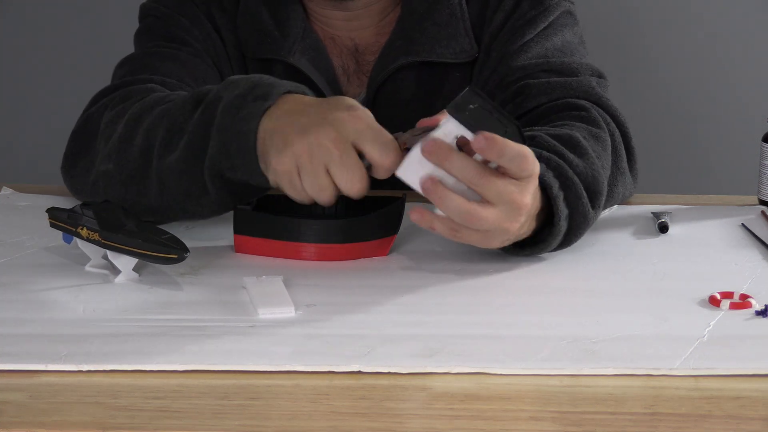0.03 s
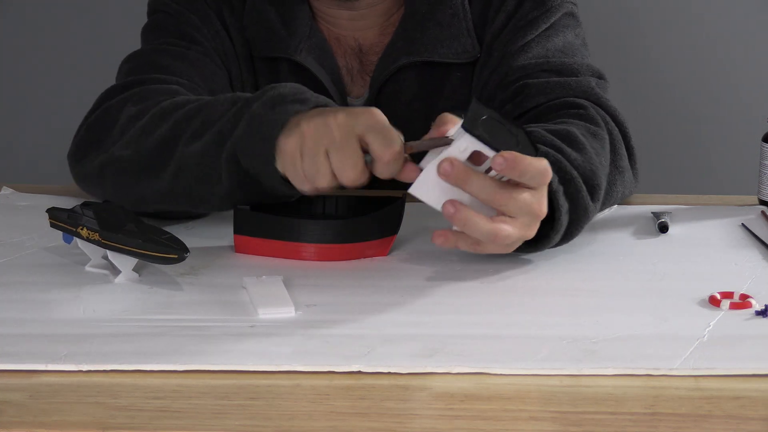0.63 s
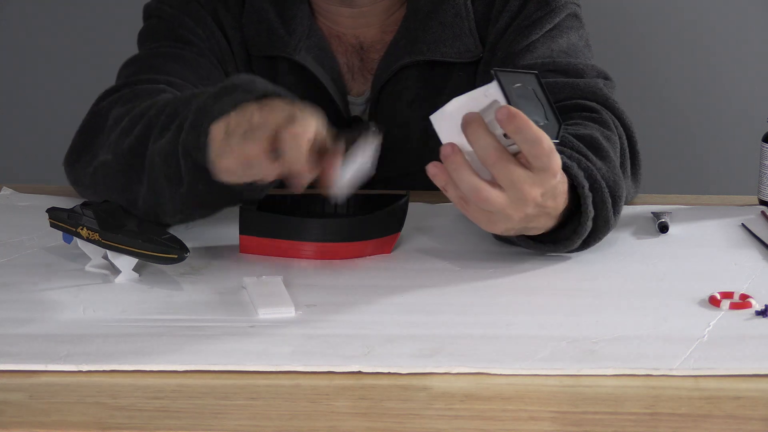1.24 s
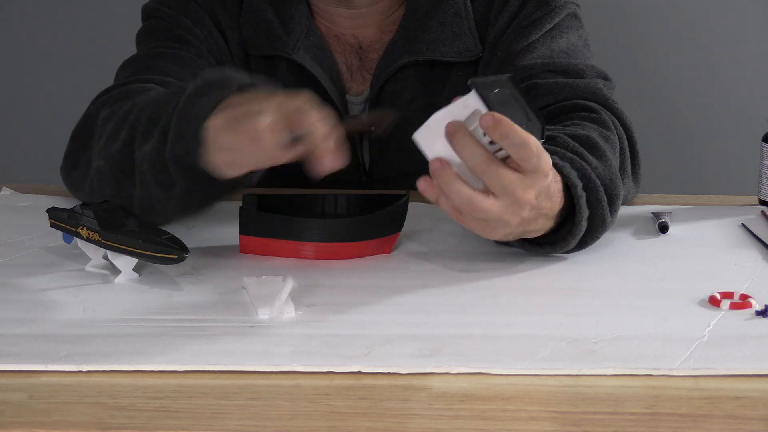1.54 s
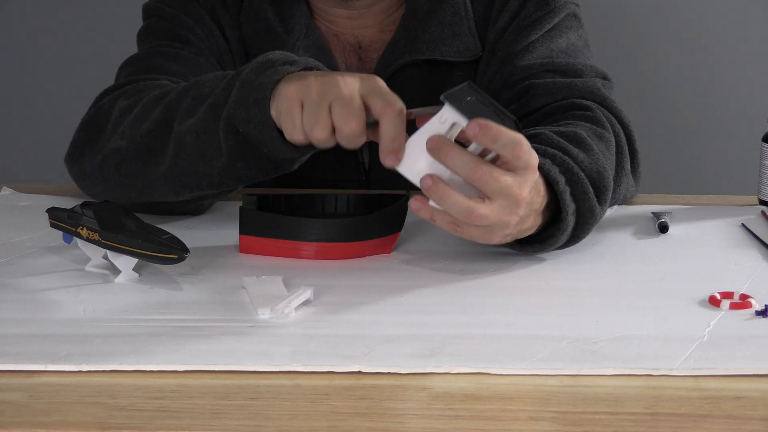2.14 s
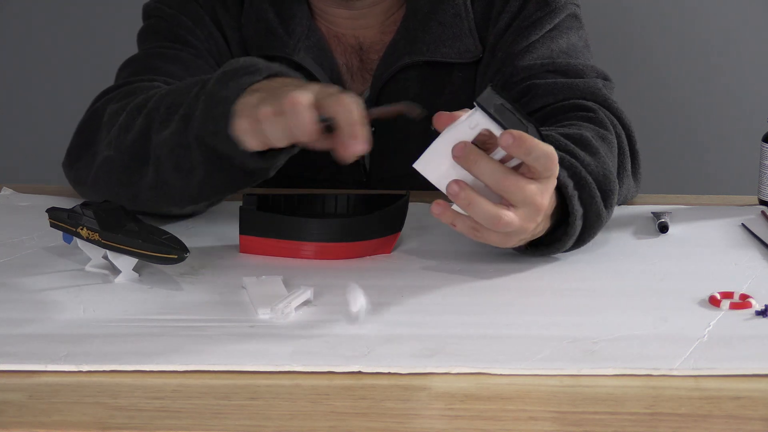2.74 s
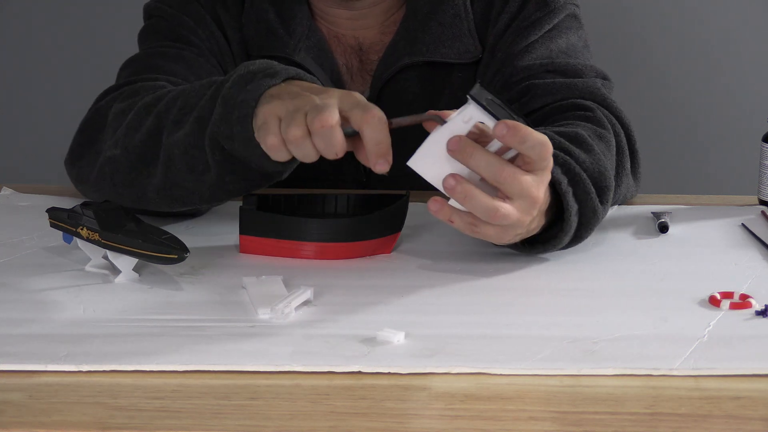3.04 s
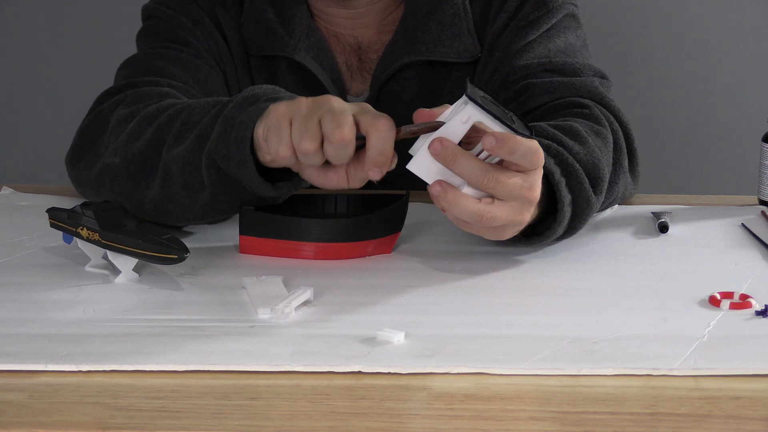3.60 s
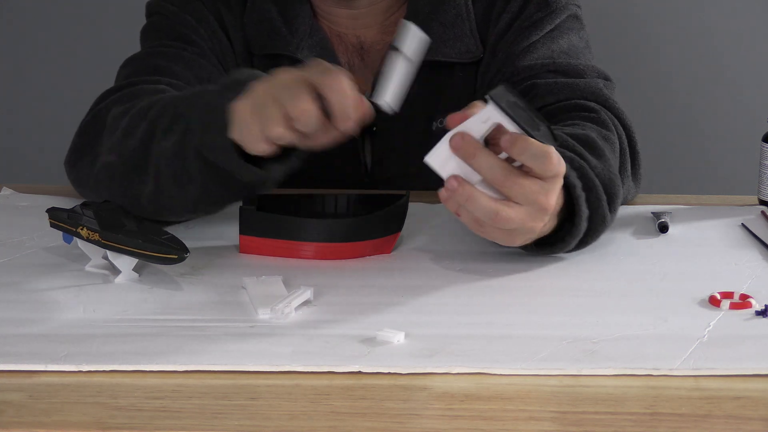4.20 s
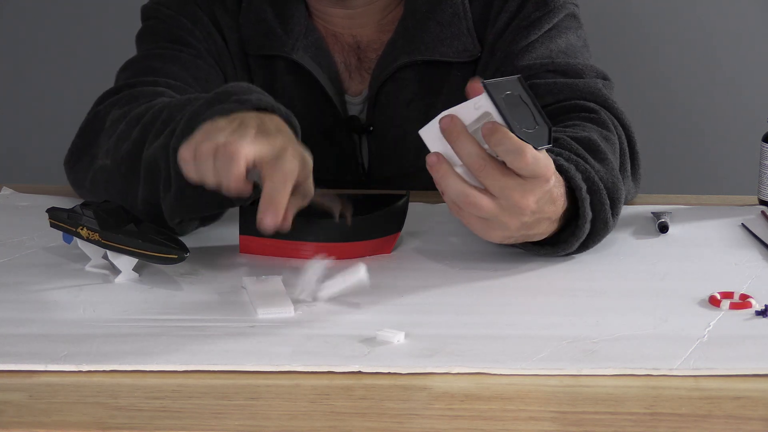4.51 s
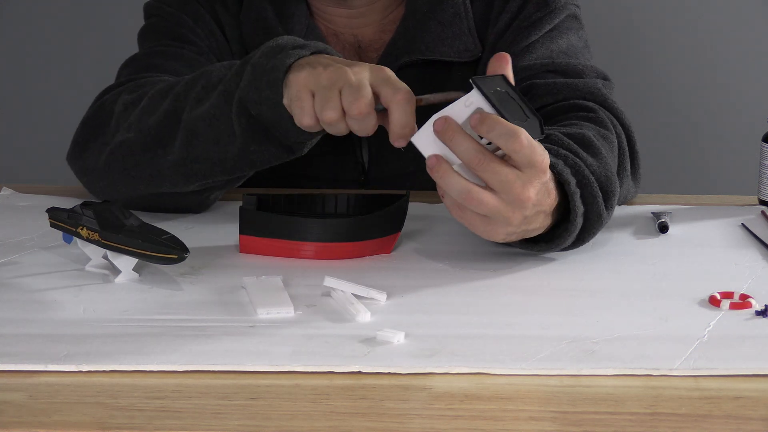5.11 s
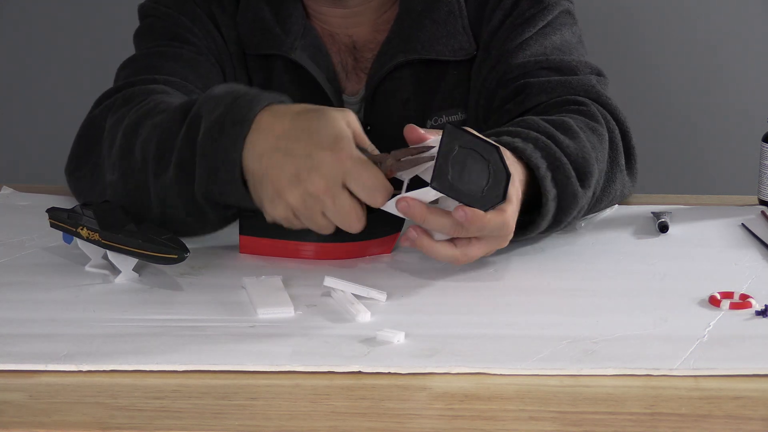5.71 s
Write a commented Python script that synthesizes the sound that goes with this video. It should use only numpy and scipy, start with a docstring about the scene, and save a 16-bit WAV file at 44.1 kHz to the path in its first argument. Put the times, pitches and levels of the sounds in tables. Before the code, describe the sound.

Pliers snap bits off a small plastic part in sharp, irregular cracks, with scraps clattering onto a table in a quiet room.

```python
"""Sharp snaps, close up: pliers break support material off a small printed plastic part in a small room.
Each snap is a burst of tiny fractures that rings the hand-held part. The jaws squeak, knock and scrape
between grips; freed scraps fall and rattle on the table.
The loudest snaps overload the microphone's amplifier."""
import sys
import numpy as np
from scipy import signal
from scipy.fft import rfft, irfft
from scipy.io import wavfile
from scipy.ndimage import uniform_filter1d

SR = 44100
rng = np.random.default_rng(int(sys.argv[2]) if len(sys.argv) > 2 else 0)


def waveform_to_disk(signal):
    """Save audio, clipped to [-1, 1], as 16-bit WAV at the path in sys.argv[1]."""
    frames = np.transpose(np.atleast_2d(signal))
    scaled = np.clip(frames, -1, 1) * 32767
    samples = np.round(scaled).astype(np.int16)
    wavfile.write(sys.argv[1], SR, samples)


N = 262395
EVENT_SAMPLES = 4096
BIN_HZ = np.fft.rfftfreq(EVENT_SAMPLES, 1 / SR)
EVENT_TIME_S = np.arange(EVENT_SAMPLES) / SR

# Table levels are relative. Weight: gain up to 4 kHz. Knock: gain up to 700 Hz. Fizz: top treble gain.
# plastic cracks: (time [s], level [dB], crumbling time [s], weight [dB], fizz [dB])
CRACKS = [(.004, -20.5, 0.0025, -7, -2), (.023, -17.5, 0.00024, 1.5, 14), (0.05, -7, 0.00073, 3, 5),
          (0.1953, -15.5, 0.0014, 1.5, -5), (.24, -12.5, 0.0019, 7, 5.5), (.273, -21.5, 0.0027, 1.5, -10.5),
          (0.4368, -3, 0.0012, -2, 0.5), (.473, -9, 0.00079, -4, 0.5), (0.543, -14, 0.0022, 1.5, 1.5),
          (.7254, -27.5, 0.00072, -6.5, 0), (0.7792, -23.5, 0.0004, -15, 7.5), (.79, -24, 0.0026, 15, -4.5),
          (.8976, -6.5, 0.001, -8, -1.5), (0.9789, -7, 0.0042, 2, 1.5), (1.3272, -28, 0.00076, -6.5, 8),
          (2.3326, -33.5, 0.0035, -5, -1.5), (2.4099, -17.5, 0.012, -1.5, -1),
          (2.4423, -16, 0.0033, -1, -2), (3.5687, -21.5, .0006, -17.5, -17),
          (3.5835, -14.5, 0.0013, -1, -2), (3.6275, -3.5, 0.00057, -5, -4.5),
          (3.9106, -4, 0.0019, -2.5, -5), (4.0224, -15, 0.0021, -1.5, -4.5), (4.0684, -26, 0.00025, 0, 1),
          (4.099, -24, 0.0072, 7.5, -3), (4.5, -26, 0.0025, -16.5, 4.5), (5.7949, -30, 0.0017, 2, -0.5),
          (5.9133, -9.5, 0.0016, 4.5, 2.5)]
# jaws knock on the part: (time [s], level [dB], weight [dB], knock [dB])
JAW_KNOCKS = [(0.1724, -34.5, 16, 3), (0.3442, -30.5, 14, -3), (2.1789, -40, 6, -13),
              (2.3497, -37.5, 9, 14.5), (3.284, -35, 13.5, 19.5), (3.388, -35.5, 3, 11),
              (3.8502, -34, 7.5, 7.5), (4.1382, -34, 14, 9), (4.1641, -29, 6, 6), (5.2846, -46.5, 10, 13),
              (5.3675, -34.5, 6.5, 14.5), (5.4863, -41.5, 4.5, 24), (5.864, -34.5, 16, 1.5)]
# fine splinters tick off: (time [s], level [dB])
SPLINTERS = [(0.5503, -25.5), (0.6497, -35.5), (.732, -36.5), (0.744, -39.5), (.766, -43), (1.956, -49),
             (2.2625, -45), (3.55, -45.5), (4.2366, -31), (5.7, -50.5), (5.8173, -29), (5.8305, -34)]
# resonances of the part: (frequency [Hz], width [Hz], level [dB])
PART_MODES = [(455, 45, -6.5), (725.5, 40, -5.5), (1055, 50, -13.5), (1837, 160, -3), (2967, 69, 5.5),
              (3820, 60, -2), (4770, 82, 2), (7250, 440, 6), (7990, 80, 12), (10625, 1400, 4.5)]
# bare fracture between the modes: (frequency [Hz], level [dB])
FRACTURE_SPECTRUM = [(30, -38.5), (220, -17.5), (600, -12.5), (2300, -27.5), (3200, -3.5), (5400, -7),
                     (7300, 7.5), (9200, -7.5), (15500, -8.5)]
# plastic squeaks: (time [s], length [s], initial slip rate [Hz], settled slip rate [Hz], level [dB])
SQUEAKS = [(0.014, .035, 3850, 2946, -41.5), (2.132, 0.039, 725, 673, -47.5),
           (2.4073, 0.027, 4027, 2863, -27.5)]
# jaw strokes along the part: (time [s], length [s], level [dB], weight [dB])
SCRAPES = [(.652, 0.024, -50, 1.5), (1.942, 0.13, -61, 1.5), (2.107, .05, -43.5, 2),
           (2.35, 0.027, -49.5, -4), (3.178, 0.11, -62.5, 7), (4.188, .05, -36.5, -7),
           (5.168, 0.02, -62.5, -4), (5.214, 0.017, -64, 5), (5.317, 0.03, -63, 7),
           (5.425, 0.067, -61.5, 1.5)]
# rubbing colour, on top of the part's own: (frequency [Hz], gain [dB])
RUB_SPECTRUM = [(100, 0), (700, 13), (1300, 9.5), (7000, -4), (15000, -8)]
# falling scraps: (time [s], landing [dB], first bounce [dB], fade per doubling of bounce count [dB],
# first flight [s], rebound [ratio], slap delay [s], slap [dB], contact [s], knock [dB], brightness [dB])
FALLS = [(1.4505, -29, -50, 0, .09, .7, 0.01, 0, 0.0021, -3.5, -2.5),
         (1.653, -33, -35, 8, .0765, 0.59, .017, -0.5, 0.0026, -5, -10.5),
         (2.7605, -20, -31, 6, .1395, 0.55, .004, -7.5, 0.0016, -13, -8.5),
         (4.579, -27, -28.5, 13.5, .16, .565, .021, 2, 0.0063, 0.5, 2)]
# scrap on the table: (frequency [Hz], level [dB])
CLACK_SPECTRUM = [(40, -13), (150, -9.5), (450, 5.5), (1000, 1.5), (2200, -3), (3200, 6), (5500, -7),
                  (8000, -2.5), (16000, -20)]
# room tail: (frequency [Hz], t60 [s], level [dB])
ROOM_BANDS = [(49.7, 0.18, -8), (302, 0.41, 1), (4193, 0.3, 2), (6940, 0.37, -1), (10300, 0.28, -2),
              (17300, 0.17, 5.5)]
# reflections off near surfaces: (delay [s], gain [dB])
ECHOES = [(.0076, -15.5), (.0085, -27.5), (0.0115, -35)]
# still room: (frequency [Hz], noise density [dB])
FLOOR_SPECTRUM = [(25, -16.5), (190, -6), (520, -7), (1000, -17.5), (1800, -21.5), (9000, -26),
                  (16000, -35.5)]


def amp(db):
    """Decibels to gain."""
    return 10 ** (np.asarray(db) / 20)


def unit_energy(x):
    """Scales to an energy of one."""
    return x / np.sqrt(np.sum(x ** 2) + 1e-20)


def curve(points, hz=BIN_HZ):
    """Interpolates (frequency [Hz], value) points on a log-frequency axis."""
    point_hz, value = np.transpose(points)
    return np.interp(np.log(hz + 1), np.log(point_hz + 1), value)


def add(mix, time_s, sound):
    """Mixes a sound in at time_s."""
    span = mix[max(round(time_s * SR), 0):][:len(sound)]
    span += sound[:len(span)]


def causal(gain):
    """Minimum-phase response: rings only after the strike."""
    log_gain = np.log(np.r_[gain, gain[-2:0:-1]] + 1e-5)
    return np.exp(np.conj(signal.hilbert(log_gain)))[:len(gain)]


def burst(length_s, grain_db, rise_s=0.0003, smooth_bins=45):
    """Whitened spectrum of a run of uneven tiny impacts that builds and dies."""
    impacts = amp(grain_db * rng.standard_normal(EVENT_SAMPLES)) * rng.standard_normal(EVENT_SAMPLES)
    attack = 1 - np.exp(-EVENT_TIME_S / rise_s)
    decay = np.exp(-(EVENT_TIME_S / length_s) ** 2 / 2)
    spectrum = rfft(impacts * attack * decay)
    colour = np.sqrt(uniform_filter1d(abs(spectrum) ** 2, smooth_bins) + 1e-12)
    return spectrum / causal(colour)


def ripple_db(depth_db, width_bins):
    """Random peaks and dips: each struck spot favours other modes."""
    return depth_db * uniform_filter1d(rng.standard_normal(len(BIN_HZ)), width_bins) * np.sqrt(width_bins)


def part_gain(grip_detune):
    """The part's modes over the bare fracture; the grip shifts them slightly."""
    power = amp(curve(FRACTURE_SPECTRUM)) ** 2
    for hz, width_hz, db in PART_MODES:
        centre_hz = hz * (1 + grip_detune * rng.standard_normal())
        offset = (BIN_HZ - centre_hz) / (width_hz / 2)
        power += amp(db) ** 2 / (1 + offset ** 2)
    return np.sqrt(power)


def tone(knock_db, weight_db, fizz_db):
    """Gain by register: hollow low knock, weight of the body, fizz on top."""
    return amp(curve([(700, weight_db + knock_db), (1800, weight_db), (4000, weight_db),
                      (6500, 0.0043), (8500, 0.0049), (11500, fizz_db)]))


def blows(jaw_contact_s=0.0026, splinter_s=0.00066):
    """Cracks, jaw knocks and splinters. Yields (time [s], level [dB], length [s], gain per bin)."""
    for time_s, db, crumble_s, weight_db, fizz_db in CRACKS:
        knock_db = -3 + 1.5 * np.log2(crumble_s / 0.002)  # longer crumbling, stronger low knock
        yield time_s, db, crumble_s, tone(knock_db, weight_db, fizz_db)
    for time_s, db, weight_db, knock_db in JAW_KNOCKS:
        yield time_s, db, jaw_contact_s, tone(knock_db, weight_db, fizz_db=-9.5)
    for time_s, db in SPLINTERS:
        yield time_s, db, splinter_s, tone(knock_db=0, weight_db=-1, fizz_db=5.5)


def snaps(gain_db=17, diffuse_contrast=0.68, dry_tick_s=0.00032):
    """Each blow rings the part. Returns (direct sound, sound sent all round)."""
    direct, diffuse = np.zeros(N), np.zeros(N)
    for time_s, db, length_s, colour in blows():
        level = amp(db + gain_db)
        body = part_gain(grip_detune=0.023) * colour
        ring = causal(body * amp(ripple_db(3, width_bins=60)))
        snap = irfft(burst(length_s, grain_db=4) * ring)
        add(direct, time_s, level * unit_energy(snap))
        send_trim = np.sqrt(1 - np.exp(-length_s / dry_tick_s))  # the briefest ticks sound slightly drier
        even_ring = irfft(causal(body ** diffuse_contrast))  # peaks even out over all directions
        add(diffuse, time_s, level * send_trim * unit_energy(even_ring))
    return direct, diffuse


def squeaks(attack_s=0.0032, fade_db=-10, settle_share=0.27, jitter=0.014, overtone_db=-8):
    """Plastic slips in the jaws, fast and even enough to make a gliding pitch."""
    out, t = np.zeros(N), EVENT_TIME_S
    for time_s, length_s, initial_hz, settled_hz, db in SQUEAKS:
        slip_hz = settled_hz + (initial_hz - settled_hz) * np.exp(-t / (settle_share * length_s))
        envelope = np.minimum(t / attack_s, 1) * amp(db + fade_db * t / length_s) * (t < length_s)
        waver = unit_energy(uniform_filter1d(rng.standard_normal(len(t)), size=30)) * np.sqrt(len(t))
        phase = 2 * np.pi * np.cumsum(slip_hz * (1 + jitter * waver)) / SR
        add(out, time_s, envelope * (np.sin(phase) + amp(overtone_db) * np.sin(2 * phase)))
    return out


def scrapes(gain_db=-1, slips_per_s=1400, grain_db=4, rise_share=0.81, release_s=0.004):
    """The jaws stick and slip over the printed layers; each slip rings the part."""
    out, t = np.zeros(N), np.arange(SR) / SR
    for time_s, length_s, db, weight_db in SCRAPES:
        pressure = np.minimum(t / (rise_share * length_s), 1)
        pressure *= np.exp(-np.maximum(t - length_s, 0) / release_s)
        slipping = rng.random(SR) < slips_per_s / SR
        slips = slipping * amp(grain_db * rng.standard_normal(SR)) * rng.choice([-1, 1], SR)
        ring = causal(part_gain(grip_detune=0) * amp(curve(RUB_SPECTRUM)) * tone(0, weight_db, 0))
        grit = signal.oaconvolve(slips, irfft(ring))[:SR]
        add(out, time_s, amp(db + gain_db) * pressure * unit_energy(grit) * np.sqrt(SR))
    return out


def bounces(count=9, slap_knock_db=8):
    """Ever shorter hops. Yields (time [s], level [dB], contact [s], knock [dB], brightness [dB])."""
    for (time_s, landing_db, bounce_db, fade_db, flight_s, rebound,
         slap_s, slap_db, contact_s, knock_db, bright_db) in FALLS:
        for k in range(count):
            speed = rebound ** k
            db = bounce_db - fade_db * np.log2(k) if k else landing_db
            treble_db = bright_db + 4 * (k > 0)
            low_db = knock_db + 0.5 * (k > 0)
            yield time_s, db, contact_s, low_db, treble_db
            # the other end slaps down flat and stirs the table more
            slap_low_db = low_db + slap_knock_db * speed ** 2
            yield time_s + slap_s * speed, db + slap_db, contact_s, slap_low_db, treble_db
            time_s += flight_s * speed


def scraps(gain_db=16, diffuse_contrast=0.96):
    """Scraps clack on the table, each edge with its own ring. Returns (direct, sent all round)."""
    direct, diffuse = np.zeros(N), np.zeros(N)
    for time_s, db, contact_s, knock_db, bright_db in bounces():
        level = amp(db + gain_db)
        shaping_db = curve([(120, -6), (700, knock_db), (1700, 0.5), (4200, 0.5), (6500, bright_db)])
        clack_db = curve(CLACK_SPECTRUM) + shaping_db
        ring = causal(amp(clack_db + ripple_db(2.5, width_bins=44)))
        clack = irfft(burst(contact_s, grain_db=5) * ring)
        add(direct, time_s, level * unit_energy(clack))
        even_ring = irfft(causal(amp(clack_db) ** diffuse_contrast))
        add(diffuse, time_s, level * unit_energy(even_ring))
    return direct, diffuse


def room_reverb(x, build_s=0.0026, tails=3):
    """Diffuse tails swell, then die by band; a cyclic crossfade stands for the moving hands."""
    out, t = np.zeros(N), np.arange(SR) / SR
    band_hz, t60_s, db = np.transpose(ROOM_BANDS)
    for k in range(tails):
        hz, age_s, noise = signal.stft(rng.standard_normal(SR), SR, nperseg=256)
        start_db = curve(np.c_[band_hz, db], hz)[:, None]
        decay_db = 60 * age_s / curve(np.c_[band_hz, t60_s], hz)[:, None]
        tail = signal.istft(noise * amp(start_db - decay_db), SR, nperseg=256)[1][:SR]
        tail *= 1 - np.exp(-(t / build_s) ** 2)
        crossfade = np.cos(2 * np.pi * np.arange(N) / SR + np.pi * k / tails) * np.sqrt(2 / tails)
        out += signal.fftconvolve(x * crossfade, unit_energy(tail))[:N]
    return out


def room_floor(rms_db=-72.5):
    """Faint steady noise of the still room."""
    colour = amp(curve(FLOOR_SPECTRUM, np.fft.rfftfreq(N, 1 / SR)))
    noise = irfft(rfft(rng.standard_normal(N)) * colour, N)
    return amp(rms_db) * unit_energy(noise) * np.sqrt(N)


def scene(hand_wet_db=-12, table_wet_db=-6):
    """Hands near the microphone; the table is farther off and wetter."""
    snapping, snaps_diffuse = snaps()
    rattle, rattle_diffuse = scraps()
    rubbing = scrapes() + squeaks()
    direct = snapping + rubbing + rattle
    room_send = amp(hand_wet_db) * (snaps_diffuse + rubbing) + amp(table_wet_db) * rattle_diffuse
    out = direct + room_reverb(room_send)
    for delay_s, db in ECHOES:
        add(out, delay_s, amp(db) * direct)
    return (out + room_floor())[None]


def record(dry, saturation_db=-14, bias=0.095, coupling_hz=18, cutoff_hz=16100):
    """The amplifier saturates unevenly, so loud snaps also thump; then the band limit."""
    drive = signal.resample_poly(dry[0], 2, 1) / amp(saturation_db)
    saturated = np.tanh(drive + bias) - np.tanh(bias)
    amplified = signal.resample_poly(saturated, 1, 2) * amp(saturation_db)
    coupled = signal.lfilter(*signal.butter(1, coupling_hz, "highpass", fs=SR), amplified)
    lowpass = signal.firwin(255, cutoff_hz, window=("kaiser", 8), fs=SR)
    return signal.oaconvolve(coupled, lowpass, "same")[None]


dry = scene()
out = record(dry)
waveform_to_disk(out)
```